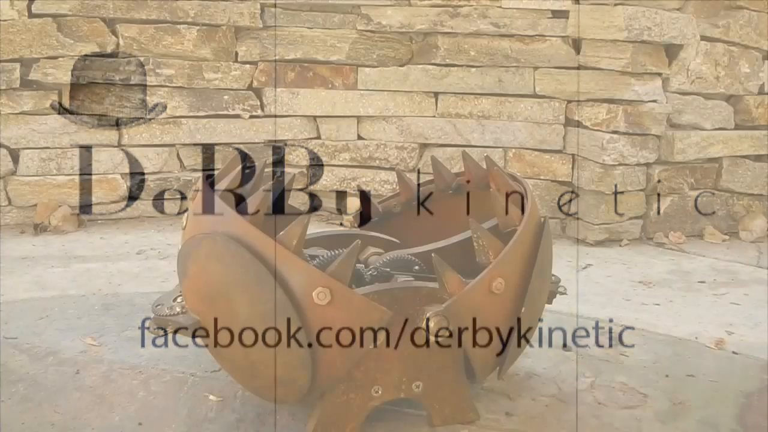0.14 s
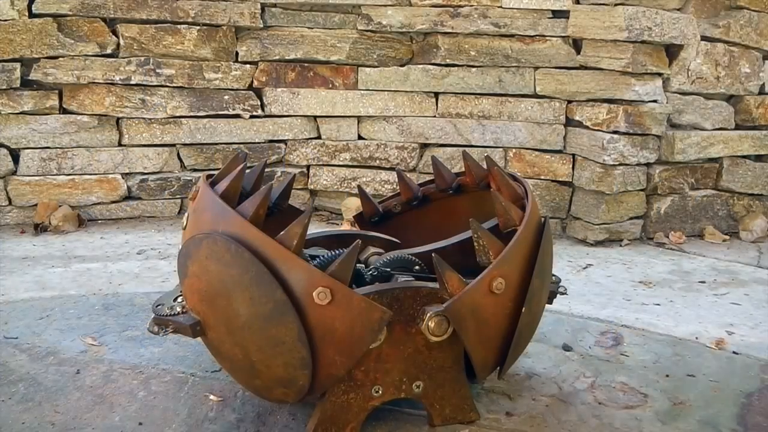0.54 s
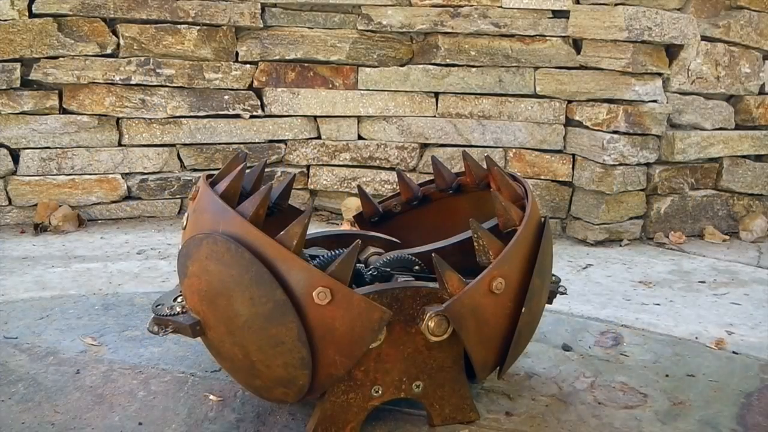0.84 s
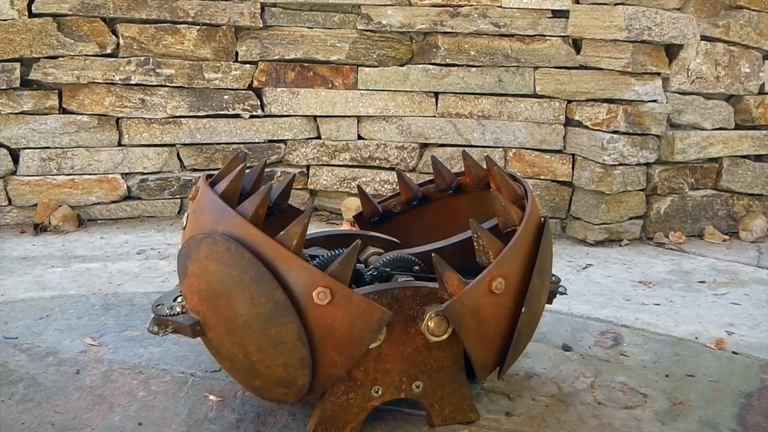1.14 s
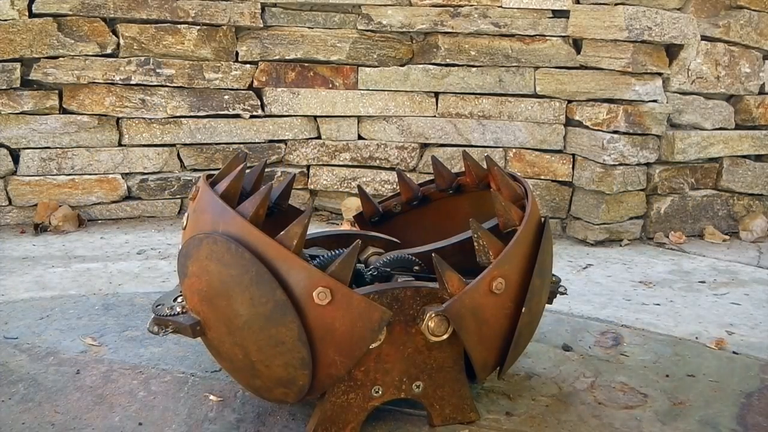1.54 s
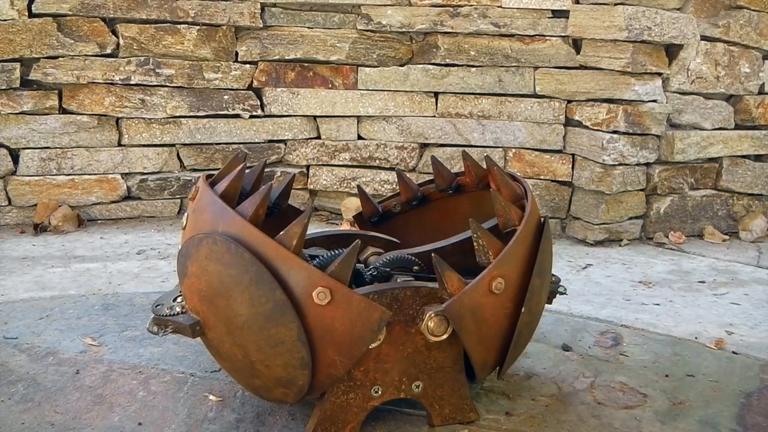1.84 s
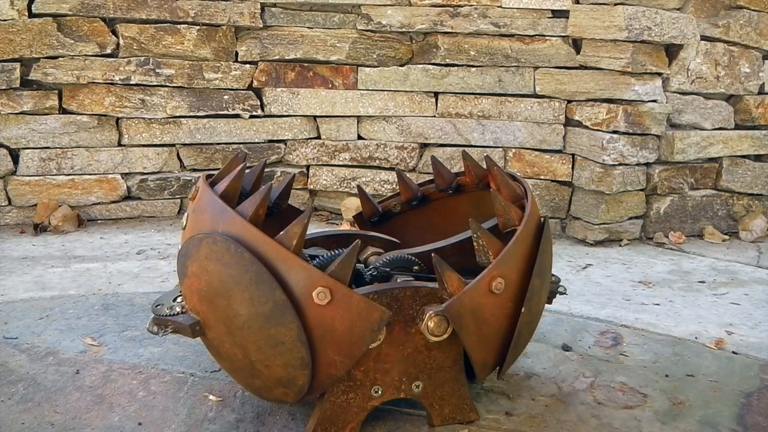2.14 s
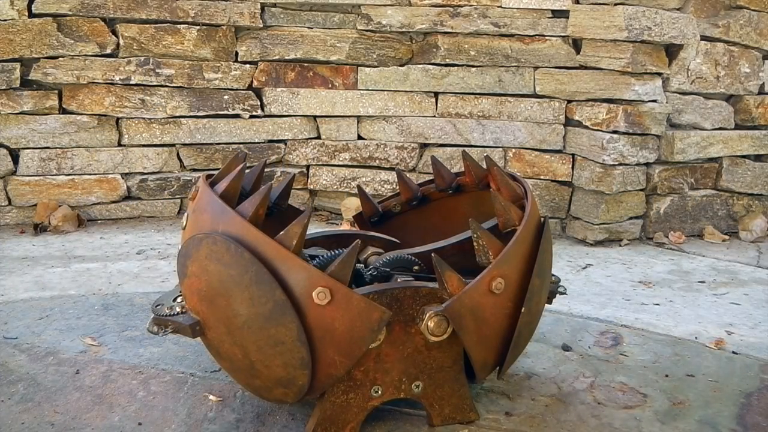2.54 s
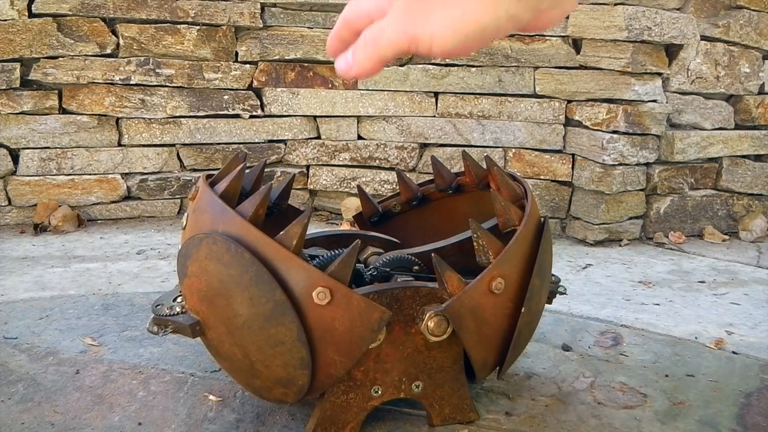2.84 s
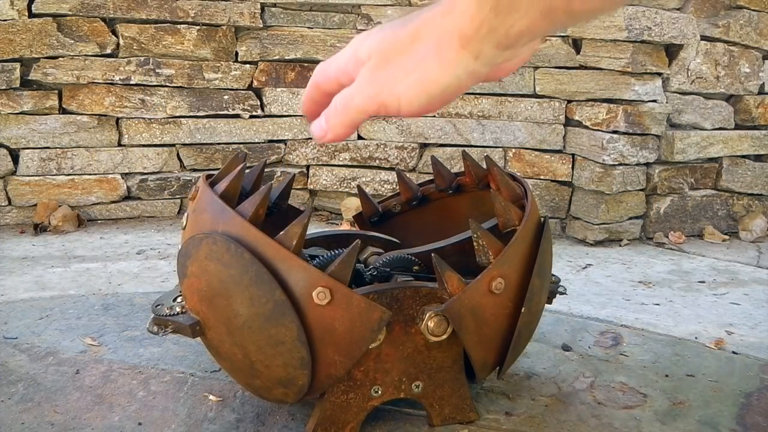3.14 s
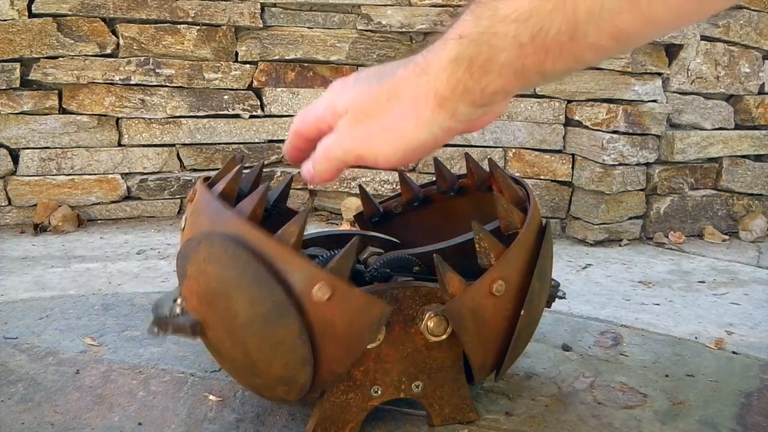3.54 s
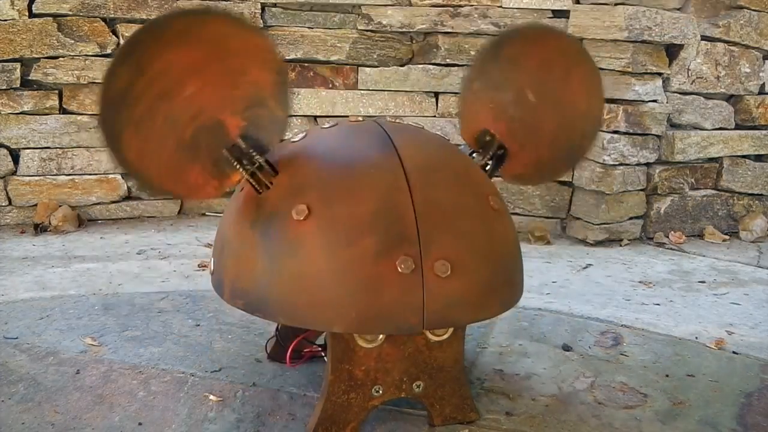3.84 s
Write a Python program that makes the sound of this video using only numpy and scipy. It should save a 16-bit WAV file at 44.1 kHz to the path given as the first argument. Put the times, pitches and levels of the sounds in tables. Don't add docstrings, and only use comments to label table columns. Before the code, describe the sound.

Outdoors by a stone wall, distant town rumble and tiny scuffs precede a sudden metallic ratchet and scrape; heavy jaws crash together, very loud and slightly clipped on a close camera microphone, with short stony reflections.

```python
import sys
import numpy as np
from scipy import signal
from scipy.fft import rfft, irfft, next_fast_len
from scipy.io import wavfile
from scipy.ndimage import uniform_filter1d, map_coordinates

SR = 44100
rng = np.random.default_rng(int(sys.argv[2]) if len(sys.argv) > 2 else 0)


def ratio(d):
    e = np.asarray(d, float) / 20
    return 10 ** e


def digitize_waveform(pressure):
    field = np.atleast_2d(pressure).T
    bounded = np.clip(field, -1, 1)
    quanta = np.round(bounded * 32767).astype(np.int16)
    wavfile.write(sys.argv[1], SR, quanta)


N = 176400

# (time [s], level [dB])
TOWN_LEVEL = [(.3, -34.5), (1.6, -34), (2.2, -35.5), (2.7, -34), (3.3, -35)]
# (frequency [Hz], density [dB per Hz])
RUMBLE_SPECTRUM = [(22, -37), (32, -26), (62, -3), (117, -3), (184, -10.5), (275, -12.5), (400, -25),
                   (700, -43)]
# (frequency [Hz], density [dB per Hz])
AIR_SPECTRUM = [(190, -29), (400, -1.5), (1030, -0.5), (2280, -11.5), (4100, -20.5), (6500, -20.5),
                (11000, -27), (15000, -59)]
# (frequency [Hz], width [Hz], level [dB])
DRONE_MODES = [(115, 22, -2), (209, 23, -8)]
# (frequency [Hz], likeness [0-1])
STEREO_LIKENESS = [(100, 1), (2000, 1), (6000, 0.59), (14000, 0.11)]
# (time [s], gain [dB])
CAMERA_GAIN = [
    (3.4, -2.5),
    (3.75, -0.5),
    (3.82, -16),
    (4.0, -0.5),
]
# (time [s], level [dB])
ROLL_LEVEL = [(1.25, -49.5), (1.4, -43), (1.62, -38), (1.76, -45.5), (1.85, -60)]
# (frequency [Hz], width [Hz], level [dB])
HOLLOW_MODES = [(445, 53, 0), (655, 133, -1.5), (930, 99, -10)]
# (start [s], length [s], level [dB], centre [Hz])
SHOE_SCUFFS = [(0.847, 0.1, -46, 6000), (0.96, 0.085, -46, 6840), (1.169, 0.16, -44, 5570),
               (1.99, 0.036, -60, 9000), (2.568, 0.068, -45, 9000), (2.618, 0.099, -45.5, 9100),
               (2.706, .1, -50, 5950)]
# (time [s], peak [dB], pitch [Hz])
PEBBLE_TICKS = [(1.154, -33.5, 3100), (1.593, -38, 6000), (1.610, -38, 5600), (1.614, -34, 2600),
                (1.633, -33, 2310), (1.648, -38.5, 5400), (1.669, -34, 1800), (1.680, -39.5, 5600),
                (1.702, -38, 2200), (1.732, -39.5, 5500), (2.599, -30.5, 9450), (2.616, -34, 3000),
                (3.116, -38.5, 2800), (3.119, -27.5, 680)]
# (time [s], scrape level [dB], sparkle level [dB])
SLIDE_LEVELS = [(3.36, -55, -46), (3.385, -31.5, -44.5), (3.41, -27.5, -33.5), (3.49, -22, -28),
                (3.55, -21, -27.5), (3.595, -22.5, -36), (3.61, -27.5, -34.5), (3.68, -24, -28),
                (3.71, -19.5, -22.5), (3.745, -17, -27.5), (3.76, -25, -24), (3.79, -16, -31),
                (3.815, -36, -47), (3.84, -27, -20.5), (3.9, -36, -29), (3.94, -28, -34.5), (4, -24, -34)]
# (time [s], teeth rate [Hz], level over the slide [dB])
GEAR_RATE = [(3.4, 545, -5.5), (3.49, 686.6, 0.5), (3.52, 750.5, -3.5), (3.575, 838, -3), (3.605, 700, -1),
             (3.645, 685, -3), (3.69, 658, -2.5), (3.75, 678, -3.5)]
# (frequency [Hz], width [Hz], level [dB])
SHELL_MODES = [(1340, 100, -6.5), (1695, 79, 8), (2026, 105, 2.5), (2268, 73, 8), (2830, 270, -2),
               (3470, 160, 4.5)]
# (frequency [Hz], density [dB per Hz])
SCRAPE_SPECTRUM = [(250, -56), (900, -11), (1500, -8.5), (2800, -7), (3700, -6.5), (4400, -12), (6000, -42)]
# (frequency [Hz], density [dB per Hz])
SPARKLE_SPECTRUM = [(3600, -23), (4600, -2.5), (8410, -5), (11500, -9.5), (15100, -12.5), (16000, -23)]
# (frequency [Hz], width [Hz], level [dB])
SMALL_PART_MODES = [(4830, 58, 0), (6120, 75, 7), (8600, 170, -7), (11300, 120, 7.5)]
# (start [s], length [s], level [dB], pitch [Hz])
SINGLE_TONES = [(3.415, 0.013, -24.5, 2800), (3.432, .016, -31, 4830), (3.44, .027, -25, 2740),
                (3.47, .01, -28, 4830), (3.484, .03, -24, 2793), (3.487, 0.012, -28, 2040),
                (3.511, 0.015, -26, 2195), (3.517, 0.02, -29, 4830), (3.524, 0.036, -26.5, 3405),
                (3.551, 0.03, -28, 1692), (3.594, 0.012, -23, 2105), (3.694, .018, -23.5, 2000),
                (3.693, .012, -24.5, 3265), (3.716, .018, -27.5, 1355), (3.729, 0.021, -21, 3380),
                (3.765, 0.015, -23, 5670), (3.819, 0.008, -23, 2150), (3.849, 0.0205, -8.5, 702.7),
                (3.908, 0.01, -19, 2050), (3.91, 0.012, -26, 647), (3.992, 0.0072, -23.5, 2080)]
# (time [s], peak [dB], centre [Hz], t60 [s])
CLASHES = [(3.36, -31, 6780, 0.04), (3.553, -18.5, 10070, 0.073), (3.709, -6.5, 8980, 0.069),
           (3.711, -18, 4880, 0.043), (3.748, -6, 8930, 0.044), (3.764, -9, 6530, 0.064),
           (3.779, -15, 6930, 0.048), (3.8, -14.5, 8000, 0.048), (3.829, -2, 7340, 0.049),
           (3.8335, -4, 8560, 0.04), (3.883, -10.5, 6950, 0.059)]
# (time [s], peak [dB], centre [Hz], t60 [s])
KNOCKS = [(3.575, -28, 518, 0.088), (3.592, -22.5, 596, 0.085), (3.727, -18, 1110, 0.05),
          (3.734, -20.5, 486, 0.068), (3.745, -21.5, 700, 0.049), (3.784, -9.5, 986, .04),
          (3.792, -13, 1210, 0.027), (3.800, -17, 3290, 0.043), (3.8745, -15.5, 1014, .06),
          (3.889, -17, 747, 0.045), (3.811, -21, 2510, 0.036), (3.822, -22, 2820, 0.016),
          (3.847, -17, 2420, 0.074), (3.892, -9, 2265, 0.06), (3.911, -17, 2030, 0.059),
          (3.904, -14, 3150, 0.015), (3.968, -23, 1185, 0.086)]
# (time [s], peak [dB], centre [Hz], t60 [s])
JAW_BLOWS = [
    (3.8505, -2, 2300, 0.073),
    (3.857, -3.5, 2500, 0.094),
    (3.874, -14, 2700, .07),
    (3.7695, -8, 1400, 0.076),
    (3.852, -13.5, 1100, .07),
]
# (frequency [Hz], level [dB], t60 [s])
JAW_MODES = [(558, -20, 0.1), (841, -18, 0.11), (1196, -22.5, 0.49), (1910, -14, 0.42), (2198, -4, 0.18),
             (2613, 1.5, 0.15), (2936, -4, 0.11), (3442, 2.5, 0.084), (3736, -3.5, 0.11)]
# (frequency [Hz], t60 [s])
YARD_T60 = [(300, 0.29), (10000, 0.33)]
# (frequency [Hz], level [dB])
PORT_DIFFERENCE = [(600, -34), (2200, -20), (5000, -25), (9000, -11.5), (14000, -5.5)]
# (frequency [Hz], gain [dB])
MIC_COLOUR = [(2800, 0), (3250, 2), (3600, 0.5), (3950, 3.5), (4400, -1.5), (4900, -0.5)]


def unit(x):
    return x / np.sqrt(np.mean(x ** 2) + 1e-20)


def along(points, hz):
    f, value = np.transpose(points)
    return np.interp(np.log(hz + 1), np.log(f + 1), value)


def curves(rows, outside=None):
    s, *columns = np.transpose(rows)
    return [np.interp(np.arange(N) / SR, s, c, outside, outside) for c in columns]


def wobble(rate_hz):
    knots = rng.standard_normal(int(N * rate_hz / SR) + 4)
    return map_coordinates(knots, [np.arange(N) * rate_hz / SR])


def filtered(x, response):
    m = next_fast_len(N + SR // 2)
    return irfft(rfft(x, m) * response(np.fft.rfftfreq(m, 1 / SR)), m)[..., :N]


def peaks(modes):
    def response(f):
        total = 0
        for k, (hz, width_hz, db) in enumerate(modes):
            damping = 1j * f * width_hz
            total = total + (-1) ** k * ratio(db) * damping / (hz * hz - f * f + damping)
        return total
    return response


def bell(f, centre_hz, octaves):
    return np.exp(-0.5 * (np.log2((f + 1) / centre_hz) / octaves) ** 2)


def rush(gain, patchy_db):
    z = signal.stft(rng.standard_normal((2, N)), nperseg=512)[2]
    field = uniform_filter1d(rng.standard_normal(z.shape[1:]), 6, 0)
    field = unit(uniform_filter1d(field, 12, 1))
    pair = signal.istft(z * ratio(patchy_db * field), nperseg=512)[1][:, :N]

    def spread(f):
        angle = np.arccos(np.clip(along(STEREO_LIKENESS, f), -1, 1)) / 2
        return gain(f) * np.array([np.cos(angle), np.sin(angle)])

    mid, side = filtered(pair, spread)
    return unit(np.array([mid + side, mid - side]))


def hits(rows, octaves, crack, attack_s, count):
    out, t = np.zeros(N + SR), np.arange(SR // 3) / SR
    f = np.fft.rfftfreq(len(t), 1 / SR)
    for s, db, hz, t60_s in rows:
        r = rng.standard_normal((count, 4))
        pitch_hz = np.clip(hz * 2 ** (octaves * r[:, :1]), 60, SR / 2)
        life_s = t60_s * 2 ** (0.51 * np.tanh(r[:, 1:2]))
        decay = ratio(5.17 * r[:, 2:3] - 60 * t / life_s)
        ring = (decay * np.sin(2 * np.pi * pitch_hz * t + r[:, 3:])).sum(0)
        band = bell(f, hz, 1.75 * octaves)
        noise = unit(irfft(rfft(rng.standard_normal(len(t))) * band, len(t)))
        noise = noise * ratio(-60 * t / (0.61 * t60_s))
        body = (ring / np.sqrt(count * 1.64) + crack * noise) * (1 - np.exp(-t / attack_s))
        out[round(s * SR):][:len(t)] += ratio(db - 4) * body
    return out[:N]


def town():
    level_db, = curves(TOWN_LEVEL)
    low = rush(lambda f: ratio(along(RUMBLE_SPECTRUM, f)), patchy_db=0) * ratio(1.1 * wobble(9.8))
    drone = rush(lambda f: abs(peaks(DRONE_MODES)(f)) ** 2, patchy_db=1) * ratio(-3 + 1.2 * wobble(7.3))
    air = rush(lambda f: ratio(along(AIR_SPECTRUM, f)), patchy_db=1) * ratio(-6 + 0.59 * wobble(5.18))
    return ratio(level_db) * (low + drone + air)


def roll():
    level_db, = curves(ROLL_LEVEL, -90)
    knocks = rng.standard_normal(N) * ratio(2.5 * wobble(50))
    return ratio(level_db) * unit(filtered(knocks, lambda f: peaks(HOLLOW_MODES)(f) * f / (f + 300j)))


def scuffs():
    out = np.zeros((2, N))
    for s, length_s, db, hz in SHOE_SCUFFS:
        u = np.clip((np.arange(N) / SR - s) / length_s, 0, 1)
        shape = np.sin(np.pi * u ** 1.18) ** 0.67
        grit = rng.standard_normal((3, N)) * ratio(1.5 * wobble(150))
        pair = grit[0] + 0.42 * grit[1:]
        band = filtered(pair, lambda f: bell(f, hz, 1.8) / (1 + (f / 13000) ** 6))
        out += ratio(db) * shape * unit(band)
    return out


def pebble():
    rows = [(s, db, hz, 0.019) for s, db, hz in PEBBLE_TICKS]
    return hits(rows, octaves=0.246, crack=1.9, attack_s=0.00069, count=12)


def slide():
    scrape_db, sparkle_db = curves(SLIDE_LEVELS, -94)
    teeth_hz, gear_db = curves(GEAR_RATE, -90)
    turns = np.cumsum(np.clip(teeth_hz, 0, None) / SR) + 0.022 * wobble(500)
    gear = sum(np.cos(2 * np.pi * k * turns) * ratio(4.5 * wobble(50) - 22.5) for k in range(1, 8))

    def slips(rate_hz, spread_db):
        return unit(rng.standard_normal(N) * ratio(spread_db * wobble(rate_hz)))

    def shell(f):
        return (0.67 * peaks(SHELL_MODES)(f) + 0.32) * ratio(along(SCRAPE_SPECTRUM, f))

    def small_parts(f):
        return (1.07 * peaks(SMALL_PART_MODES)(f) + 0.9) * ratio(along(SPARKLE_SPECTRUM, f))

    def norm(response):
        return np.sqrt(np.mean(abs(response(np.linspace(20, SR / 2, 8000))) ** 2))

    low = (0.5 * slips(80, 2.5) + ratio(gear_db) * 1.9 * gear) * ratio(scrape_db)
    high = slips(200, 2.3) * ratio(sparkle_db)
    return filtered(low, shell) / norm(shell) + filtered(high, small_parts) / norm(small_parts)


def sing():
    rise_s, t60_s, roughness = 0.002, 0.02, 0.7
    out, t = np.zeros(N + SR), np.arange(SR // 8) / SR
    for s, length_s, db, hz in SINGLE_TONES:
        knots = rng.standard_normal(50) + 1j * rng.standard_normal(50)
        flutter = 1 + roughness * np.interp(t, np.linspace(0, t[-1], 50), knots)
        flutter = flutter / np.sqrt(np.mean(abs(flutter[t < length_s]) ** 2))
        shape = np.clip(t / rise_s, 0, 1) * ratio(-60 * np.clip(t - length_s, 0, 1) / t60_s)
        tone = (flutter * np.exp(2j * np.pi * hz * t)).imag
        out[round(s * SR):][:len(t)] += ratio(db + 1) * shape * tone
    return out[:N]


def clatter():
    clashes = hits(CLASHES, octaves=0.4, crack=0.91, attack_s=0.0012, count=40)
    return clashes + hits(KNOCKS, octaves=0.4, crack=1.23, attack_s=0.00079, count=24)


def slam():
    t = np.clip(np.arange(N) / SR - JAW_BLOWS[0][0], 0, None)
    ring = sum(ratio(-8 + db - 60 * t / t60_s) * np.sin(2 * np.pi * hz * t) for hz, db, t60_s in JAW_MODES)
    blows = hits(JAW_BLOWS, octaves=0.55, crack=1.0, attack_s=0.001, count=40)
    blows = filtered(blows, lambda f: 1 / (1 + 1j * f / 4200 * 0.96 - (f / 4200) ** 2) ** 2)
    thud = hits([(3.851, -11, 299, 0.08)], octaves=0.79, crack=1.75, attack_s=0.00098, count=8)
    return blows + ring * ratio(3.86 * wobble(90)) + thud


def yard(x):
    hz, t, z = signal.stft(rng.standard_normal((2, SR // 2)), SR, nperseg=256)
    decay = ratio(-60 * t / along(YARD_T60, hz)[:, None])
    tail = signal.istft(z * decay, SR, nperseg=256)[1]
    tail = tail[0] + 0.34 * tail
    delayed = np.pad(x, (250, 0))[None]
    return signal.fftconvolve(delayed, tail / np.linalg.norm(tail[0]), axes=1)[:, :N]


def scene():
    near = slide() + sing() + slam() + clatter() + pebble() + roll()
    smear = unit(rng.standard_normal(300)) * ratio(-25)
    side = signal.fftconvolve(near, smear)[:N]
    side = filtered(side, lambda f: ratio(along(PORT_DIFFERENCE, f)))
    camera_db, = curves(CAMERA_GAIN)
    far = town() * ratio(camera_db) * ratio([[-0.45], [0.45]])
    direct = near * ratio([[-0.25], [0.25]]) + side * [[1], [-1]]
    return direct + ratio(-11) * yard(near) + scuffs() + far


def roll_off(x):
    return signal.sosfilt(signal.butter(12, 15900, fs=SR, output="sos"), x)


def record(dry):
    fade_s, fade_db = 0.36, -22.5
    fade = ratio(fade_db * np.clip(1 - np.arange(N) / SR / fade_s, 0, 1) ** 2.1)
    x = filtered(dry, lambda f: ratio(along(MIC_COLOUR, f)) / (1 + (f / 15000) ** 12)) * fade
    x = x / (1 + abs(x / 1.02) ** 12) ** (1 / 12)
    return roll_off(x)


dry = scene()
out = record(dry)
digitize_waveform(out)
```